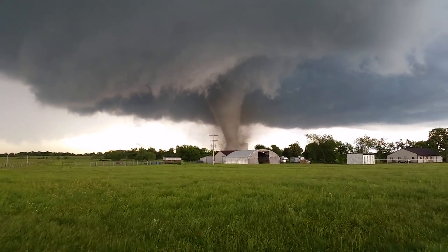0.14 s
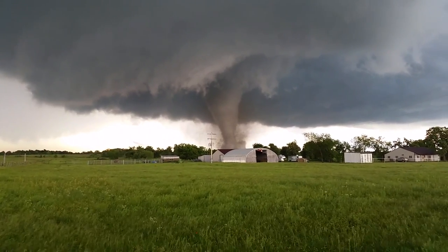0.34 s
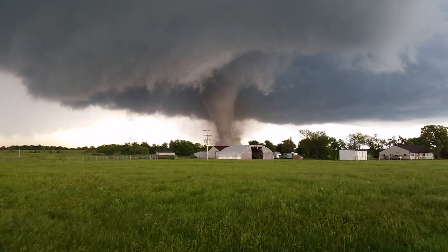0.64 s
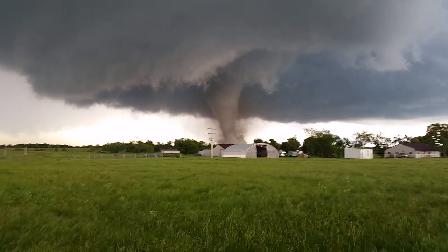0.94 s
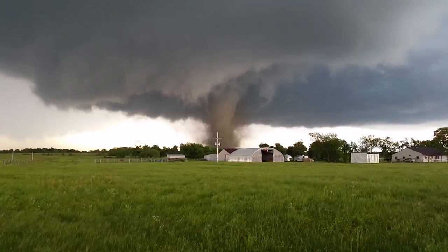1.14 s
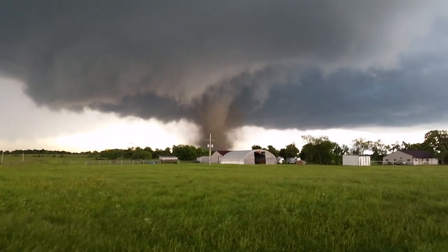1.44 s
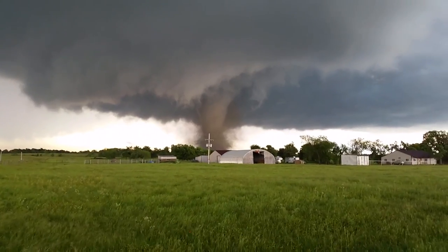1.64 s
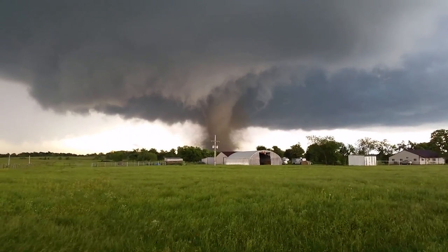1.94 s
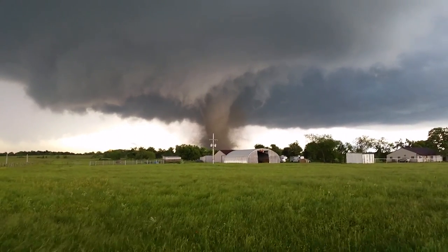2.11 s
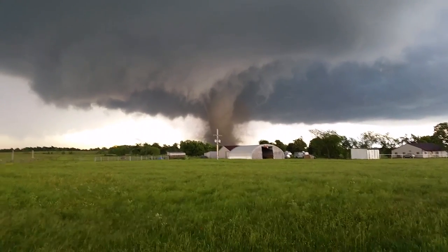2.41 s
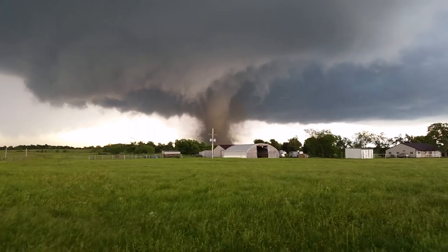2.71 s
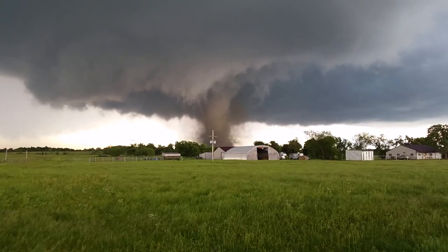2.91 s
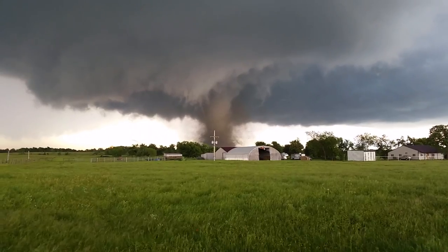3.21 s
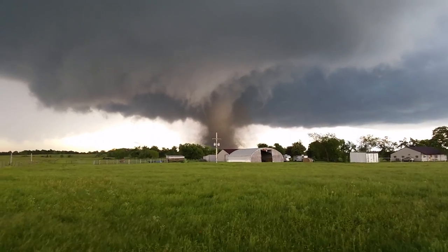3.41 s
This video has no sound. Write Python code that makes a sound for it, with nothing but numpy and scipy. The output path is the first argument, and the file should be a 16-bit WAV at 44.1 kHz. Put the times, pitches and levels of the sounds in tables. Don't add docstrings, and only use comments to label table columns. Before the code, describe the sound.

Heavy wind rumble batters the microphone outdoors, fluttering and crackling, over very faint grass hiss.

```python
import sys
import numpy as np
from scipy import signal
from scipy.fft import rfft, irfft
from scipy.io import wavfile
from scipy.ndimage import uniform_filter1d, minimum_filter1d, map_coordinates

SR = 44100
rng = np.random.default_rng(int(sys.argv[2]) if len(sys.argv) > 2 else 0)


def pcm_store(signal):
    levels = np.round(np.clip(np.atleast_2d(signal), -1, 1) * 32767)
    wavfile.write(sys.argv[1], SR, levels.astype(np.int16).T)


def voltage_ratio(level):
    return 10 ** (np.asarray(level, float) / 20)


N = 156996

# time in seconds, strength in spreads of the wander.
SWIRLS_LEFT = [(0.021, -0.7), (0.141, -1.3), (0.19, -2), (0.255, -1.2), (0.324, 0.7), (0.38, -2.3),
               (0.649, -1.1), (0.785, -0.5), (0.819, 0.2), (0.896, -2), (0.965, -0.5), (1.141, -0.5),
               (1.17, -0.6), (1.302, -2.8), (1.359, 0.7), (1.417, -1.0), (1.589, 0), (1.828, 2), (2.108, 0),
               (2.194, -1.9), (2.332, 0), (2.401, 1.3), (2.498, -2.5), (2.574, 1.5), (2.619, 4.5),
               (2.689, 1), (3.127, -2.1), (3.206, -1.5), (3.298, 0.5), (3.386, -1.4), (3.416, -2),
               (3.542, 0)]
SWIRLS_RIGHT = [(0.322, -3.5), (0.364, 0), (0.41, 0), (0.6, 0.93), (0.724, 1.6), (0.792, 0.8),
                (0.911, -0.8), (0.963, 1.4), (1.118, -1.5), (1.164, 1.5), (1.6, 1.4), (1.638, 1.5),
                (1.688, -2.5), (1.758, 2), (1.806, -2.5), (1.97, 0.93), (1.98, 0.67), (2.016, -1.5),
                (2.053, -1.4), (2.138, 0.5), (2.269, 2), (2.32, -1.8), (2.374, -2.0), (2.501, 1),
                (2.545, -0.9), (2.682, -1.5), (2.772, 2.5), (2.824, -1.5), (2.904, 2.33), (2.949, -1.9),
                (3.218, -2.1), (3.245, 1.5)]
# time in seconds, hiss level in dB.
GRASS = [(0, -70.5), (.338, -70), (.35, -80.5), (.9, -79.5), (1.13, -76.5), (1.15, -71.5), (1.28, -71.5),
         (1.45, -77), (1.6, -74), (1.78, -75), (1.9, -82), (2.03, -76), (2.05, -75), (2.25, -79),
         (2.38, -67.5), (2.55, -76.5), (3.33, -86.5), (3.56, -102)]
# frequency in Hz, density in dB per Hz.
PORT_LEFT = [(2000, -2.5), (4500, -2.5), (5800, -10.5), (8200, -3), (9600, -20), (12000, -14.5),
             (14000, -15.5), (16000, -21.5)]
PORT_RIGHT = [(2000, -15.5), (5000, -17.5), (7000, -25), (9500, -14), (11500, 5), (12300, -3), (14000, -19),
              (16000, -25.5)]


def unit(x):
    return x / np.sqrt(np.mean(x ** 2))


def curve(table):
    return np.interp(np.arange(N) / SR, *np.array(table).T[:2])


def colour(table, hz):
    table_hz, table_db = np.array(table).T
    return np.interp(np.log(np.maximum(hz, 1)), np.log(table_hz), table_db)


def tint(x, table, share=1):
    gain = voltage_ratio(share * colour(table, np.arange(N // 2 + 1) * SR / N))
    return irfft(rfft(x) * unit(gain), N)


def walk(rate):
    knots = rng.standard_normal(1000)
    return map_coordinates(knots, [np.arange(N) / SR * rate], order=3)


def bumps(times, sizes, lengths_ms):
    out = np.zeros(N)
    for s, size, ms in zip(times, sizes, lengths_ms):
        k = np.clip(int(s * SR) + np.arange(-2000, 2000), 0, N - 1)
        out[k] += size * np.exp(-(2 * (k / SR - s) / (ms / 1000)) ** 2)
    return out


def swirling(swirls):
    return bumps(*np.array(swirls).T, [34.4] * len(swirls))


def port_wind(gusts, puffs, swirls, buffets, eddies, mesh_hz):
    usual_db, smooth_cycles = -18.5, 0.43
    gust = curve(gusts) + bumps(*np.array(puffs).T, [70] * len(puffs))
    chance = walk(22)
    chance = chance - uniform_filter1d(chance, size=SR // 6)
    swirl = 0.3 * chance + swirling(swirls)
    flutter = walk(82)
    buffet = bumps(*np.array(buffets).T)
    buffet = buffet * (1 + 0.18 * np.tanh(flutter[::-1]))
    octaves = 0.0082 * (gust - usual_db) + 0.097 * swirl + 0.2 * flutter + 0.0607 * buffet
    level_db = gust + 2 * swirl + 0.036 * buffet

    noise = rfft(rng.standard_normal(N))
    pitch = np.log2(np.arange(N // 2 + 1) * SR / N + 1e-9)
    rest = unit(voltage_ratio(colour(eddies, 2 ** pitch)) * (pitch > 4))
    out = 0
    for step in np.arange(4.5, 13.5, .5):
        window = np.cos(np.pi * np.clip(pitch - step, -.5, .5)) ** 2
        band = irfft(noise * rest * window, N)
        shift_db = colour(eddies, 2 ** (step - octaves)) - colour(eddies, 2 ** step)
        crackle_db = 0.14 * buffet * np.clip(step - np.log2(374), 0, 1.7)
        mesh_db = -32.5 * np.maximum(0, step - np.log2(mesh_hz) - 0.002 * buffet)
        flicker_db = 1.5 * walk(13)
        db = level_db + shift_db + crackle_db + mesh_db + flicker_db
        span = 9 + int(smooth_cycles * SR / 2 ** step)
        db = uniform_filter1d(uniform_filter1d(db, span), span)
        out = out + band * voltage_ratio(db)
    return out


def wind():
    # time in seconds, rumble level in dB.
    gust_left = [(0.0, -18), (0.12, -16.5), (0.2, -14), (0.48, -24.5), (0.86, -13.5), (1.41, -17),
                 (1.58, -17), (1.7, -18.5), (2.01, -26), (2.12, -17), (2.51, -22.5), (2.63, -7.5),
                 (2.68, -23.5), (2.91, -23.5), (3.0, -20), (3.14, -18.5), (3.41, -29), (3.56, -21)]
    gust_right = [(0.0, -11), (0.2, -13.5), (0.31, -19.5), (0.39, -18.5), (0.52, -28.5), (0.61, -16.5),
                  (0.68, -29.5), (0.97, -11), (1.12, -15.5), (1.3, -9.5), (1.98, -22), (2.04, -26),
                  (2.15, -14), (2.5, -12.5), (2.69, -21), (2.77, -13.5), (3.11, -21), (3.56, -22.5)]
    # time in seconds, level change in dB.
    puffs_left = [(0.12, -9.5), (0.25, -6), (0.542, 3.5), (0.6, -5), (0.74, -5.5), (1.201, -5.5),
                  (1.92, -2.5), (2.09, -1.5), (2.341, 6.5), (2.61, -4), (2.638, 3), (2.671, -13),
                  (3.049, -1), (3.142, 9.5), (3.21, -8)]
    puffs_right = [(0.23, 0), (0.301, -2.5), (0.38, 7.5), (0.479, 7), (0.681, -8.5), (0.719, 8.5),
                   (0.78, -13), (0.91, -6.5), (1.118, -8.5), (1.692, -4), (1.728, 4), (1.881, 0.5),
                   (2.409, -3.5), (2.448, 5.5), (3.211, -1.5)]
    # time in seconds, strength in dB, length in ms.
    buffets_left = [(0.169, 11, 2.6), (0.189, 15, 9), (0.201, 12.5, 5.5), (0.806, 3, 2.9),
                    (0.819, 9.5, 4.8), (0.828, 7.5, 6), (0.932, 9.5, 3.6), (1.056, 7.5, 8.9), (1.235, 8, 5),
                    (1.346, 9, 6.7), (1.363, 6, 6.5), (1.375, 8, 5), (1.584, 9.5, 6.3), (1.599, 10.5, 5),
                    (1.821, 8.5, 4.8), (1.831, 9, 6.1), (2.098, 11, 6.3), (2.115, 13, 5.8), (2.159, 8, 3.7),
                    (2.262, 9.5, 2.5), (2.321, 8.5, 5.7), (2.332, 9.5, 8), (2.401, 9.5, 14),
                    (2.613, 21, 3.2), (2.625, 14, 5.4), (2.639, 9.5, 8.3), (3.106, 7, 4), (3.116, 9.5, 5.1),
                    (3.13, 7.5, 5), (3.302, 8, 5), (3.543, 16, 8.4)]
    buffets_right = [(0.054, 10.4, 7.7), (0.14, 9.1, 6.9), (0.19, 14, 10), (0.261, 11, 9), (0.364, 29, 5),
                     (0.388, 9, 6), (0.409, 16, 7.6), (0.598, 12.2, 4.3), (0.848, 11.3, 5.7),
                     (0.949, 7.9, 3.3), (0.996, 7.4, 4.6), (1.151, 9.8, 5.1), (1.162, 7.1, 9.8),
                     (1.172, 9, 6.5), (1.286, 12, 5), (1.308, 12, 6.7), (1.39, 13.8, 3.4),
                     (1.434, 13.4, 4.5), (1.505, 7.7, 4.6), (1.551, 9, 6), (1.6, 15.2, 9), (1.629, 11, 3.5),
                     (1.637, 25, 6), (1.645, 22, 3.5), (1.653, 12.7, 4.6), (1.727, 11, 5.1),
                     (1.739, 11, 3.7), (1.746, 15, 5), (1.754, 21, 5), (1.762, 19, 5), (1.767, 16.4, 3.4),
                     (1.964, 7.8, 8.5), (1.984, 11.8, 6), (2.086, 7.5, 9.4), (2.136, 13, 4.5),
                     (2.187, 7, 7), (2.222, 7.5, 4), (2.269, 16, 7), (2.353, 19, 7), (2.401, 8, 10),
                     (2.409, 6, 6), (2.421, 9, 12), (2.439, 8.5, 3.4), (2.447, 14.7, 3.3), (2.468, 13, 3.4),
                     (2.498, 29, 11), (2.518, 17.5, 3.9), (2.598, 9.5, 8), (2.608, 8.1, 4), (2.717, 9.5, 4),
                     (2.73, 8, 4), (2.767, 23, 5.1), (2.775, 27, 4.5), (2.786, 7, 1.3), (2.794, 16, 6.5),
                     (2.877, 16, 3.1), (2.904, 7.5, 5.2), (2.933, 11, 4), (3.243, 7.7, 9.6)]
    # frequency in Hz, density in dB per Hz.
    eddies_left = [(20, -6.5), (60, -0.5), (120, 1), (250, -11.5), (600, -31), (1500, -51), (2600, -62.5),
                   (5000, -74)]
    eddies_right = [(20, -8.5), (60, 3), (120, 1), (250, -12), (600, -29), (1500, -50), (2600, -68),
                    (5000, -92)]
    left = port_wind(gust_left, puffs_left, SWIRLS_LEFT, buffets_left, eddies_left, mesh_hz=4650)
    right = port_wind(gust_right, puffs_right, SWIRLS_RIGHT, buffets_right, eddies_right, mesh_hz=3120)
    return np.array([left, right])


def grass():
    shared_power = 0.14
    shared = rng.standard_normal(N)
    rustle = voltage_ratio(curve(GRASS) + 2.6 * walk(45))
    out = []
    for port, port_db, swirls in ((PORT_LEFT, 5.5, SWIRLS_LEFT), (PORT_RIGHT, 3.5, SWIRLS_RIGHT)):
        own = rng.standard_normal(N)
        hiss = np.sqrt(shared_power) * shared + np.sqrt(1 - shared_power) * own
        swell = voltage_ratio(0.5 * swirling(swirls))
        out.append(voltage_ratio(port_db) * tint(hiss * rustle * swell, port))
    return np.array(out)


def roar():
    # frequency in Hz, density in dB per Hz.
    roar_left = [(200, -29.5), (500, -5), (1000, 1), (2000, -4), (2700, -10), (3200, -22), (4500, -31.5),
                 (6000, -58.5)]
    roar_right = [(200, -29.5), (500, -5), (1000, -2), (1800, -9), (2300, -12), (2900, -25.5),
                  (4000, -40.5), (6000, -60)]
    swell = voltage_ratio(0.61 * (curve(GRASS) + 79.5) - 1.5 * walk(6.7))
    left = voltage_ratio(-56.5) * tint(swell * rng.standard_normal(N), roar_left)
    right = voltage_ratio(-62) * tint(swell * rng.standard_normal(N), roar_right)
    return np.array([left, right])


def casing_ticks():
    # time in seconds, peak in dB, left over right in dB.
    slips = [(0.0935, -55.5, -2.5), (0.491, -58.5, 0.5), (0.672, -66.5, -7), (1.1929, -45, -3.5),
             (1.2377, -36.5, 4.5), (1.3746, -55.5, -1.5), (1.5176, -54, 1), (1.5874, -49.5, -10),
             (1.6146, -51, -8), (1.7877, -47, -3), (2.0362, -55, -11.5), (2.1019, -62.5, -3),
             (2.3352, -54.5, 0), (2.9374, -56.5, -1.5), (3.254, -57.5, -1), (3.2959, -56, 0.5),
             (3.436, -66, 3)]
    late_s, level_db = 0.0012, -5
    s, db, pan_db = np.array(slips).T
    noise = rng.standard_normal(N)
    out = []
    for port, side in ((PORT_LEFT, .5), (PORT_RIGHT, -.5)):
        burst = noise * bumps(s + late_s, voltage_ratio(db + level_db + side * pan_db), [1.5] * len(s))
        out.append(tint(burst, port, share=0.6))
    return np.array(out)


def whine():
    t = np.arange(N) / SR
    on = uniform_filter1d(1. * (t > .965) * (t < 1.026), size=300)
    turn = 2 * np.pi * 12172 * t
    high = np.outer(voltage_ratio((-86, -67)), np.sin(turn))
    low = np.outer(voltage_ratio((-71, -87)), np.sin(turn / 3))
    return on * (high + low)


def offset_click():
    start_s, settle_ms = 1.1397, 3.6
    t = np.arange(N) / SR
    step = (t > start_s) * np.exp(-np.abs(t - start_s) * 1000 / settle_ms)
    return np.outer((.33, .11), step)


def capsule_rattle():
    # frequency in Hz, density in dB per Hz.
    body = [(500, -25), (1000, -1), (3000, -10.5), (4500, -19.5), (6000, -41)]
    burst = rng.standard_normal(N) * bumps([2.4988], [1], [6.6])
    rattle = voltage_ratio(-32.5) * tint(burst, PORT_RIGHT, share=0.93) + voltage_ratio(-12) * tint(burst, body)
    return np.outer([0, 1], rattle)


def scene():
    return wind() + grass() + roar() + casing_ticks() + whine() + offset_click() + capsule_rattle()


def top_cut(x):
    return signal.sosfilt(signal.butter(12, 15830, fs=SR, output="sos"), x)


def record(dry):
    peak = -minimum_filter1d(-np.abs(dry), size=441, axis=1)
    gain = uniform_filter1d(np.minimum(1, .9 / (peak + 1e-9)), size=441, axis=1)
    left_ms = (N - np.arange(N)) / SR * 1000
    fade = np.clip(left_ms / 6, .2, 1)
    return top_cut(dry * gain * fade)


dry = scene()
out = record(dry)
pcm_store(out)
```